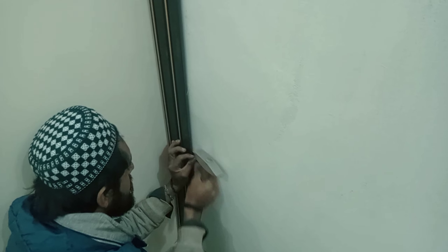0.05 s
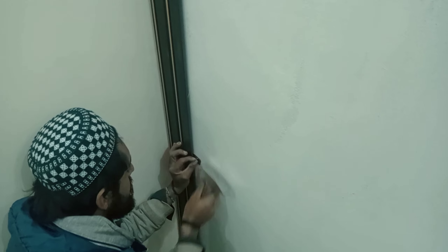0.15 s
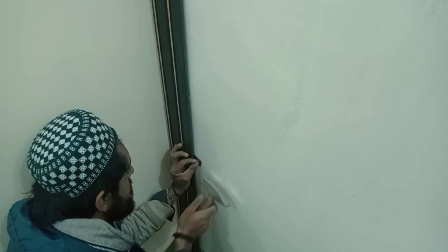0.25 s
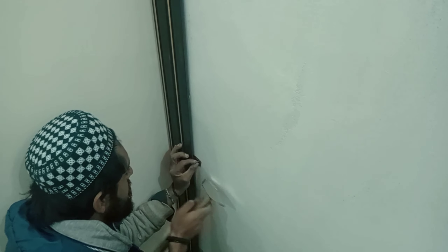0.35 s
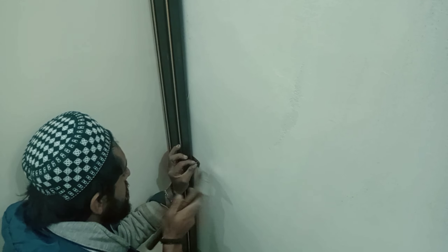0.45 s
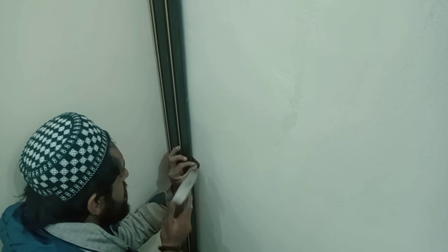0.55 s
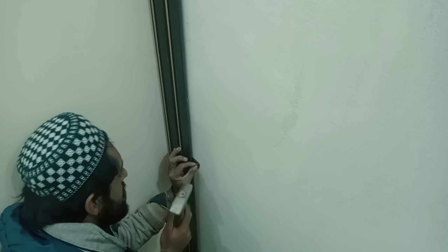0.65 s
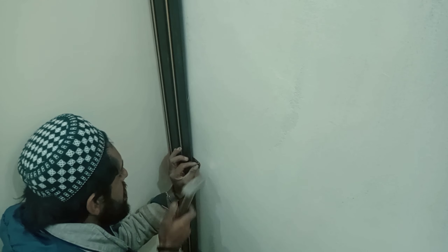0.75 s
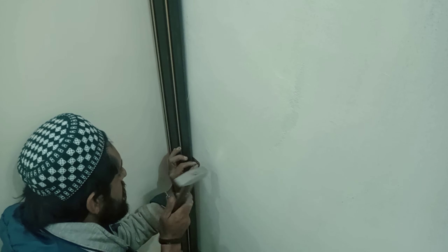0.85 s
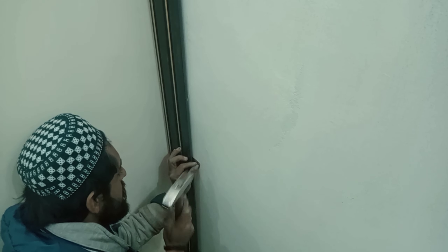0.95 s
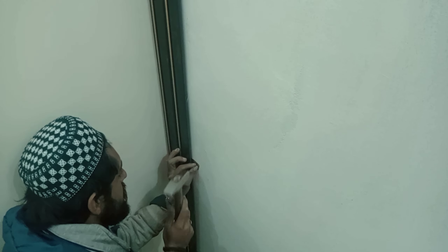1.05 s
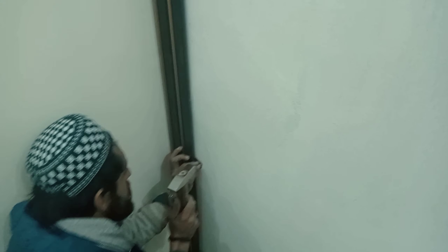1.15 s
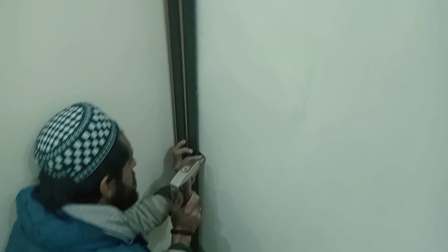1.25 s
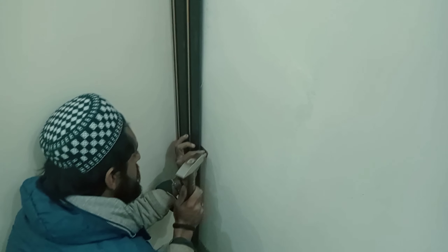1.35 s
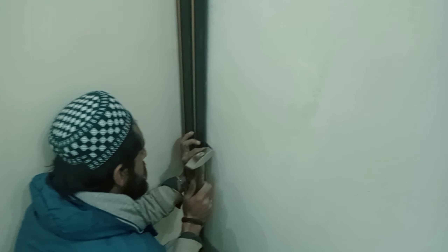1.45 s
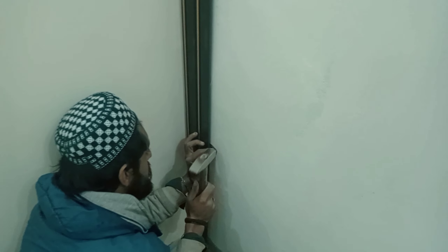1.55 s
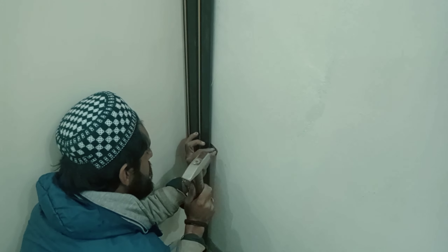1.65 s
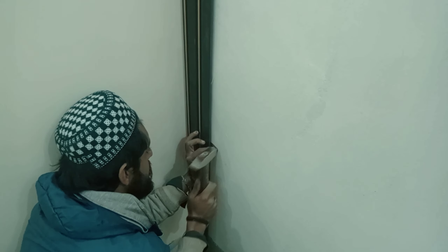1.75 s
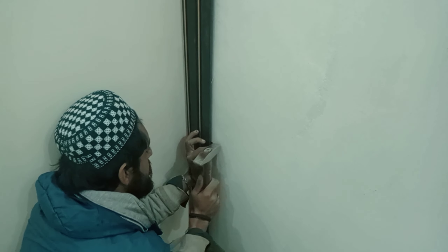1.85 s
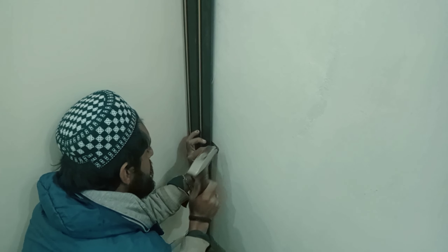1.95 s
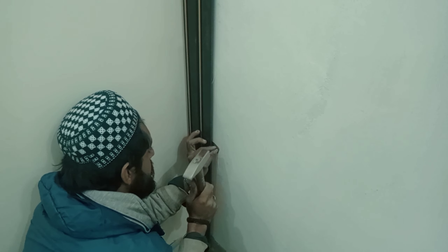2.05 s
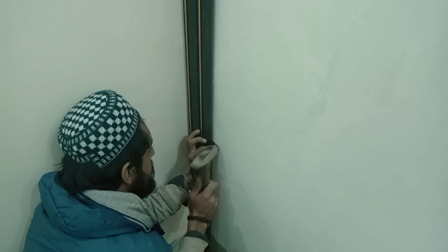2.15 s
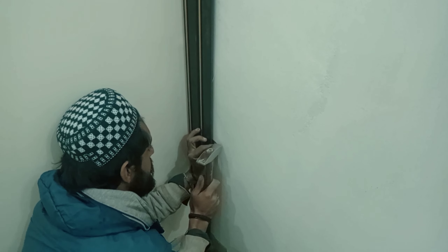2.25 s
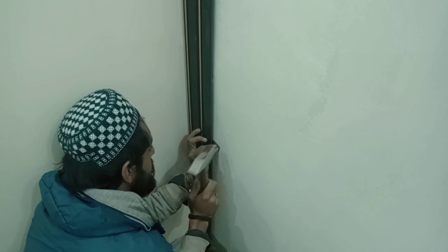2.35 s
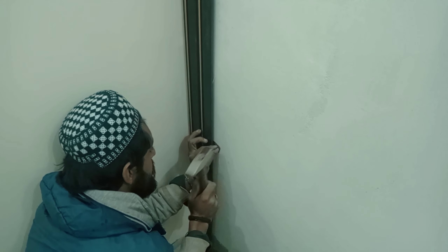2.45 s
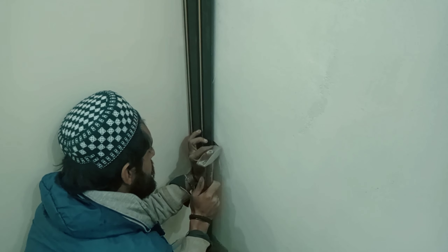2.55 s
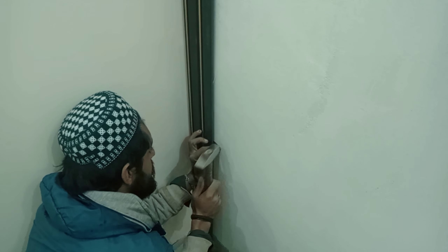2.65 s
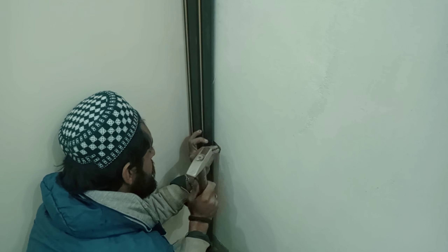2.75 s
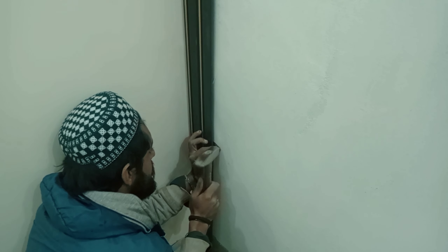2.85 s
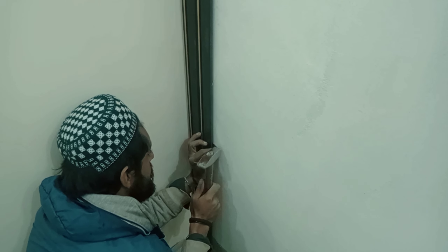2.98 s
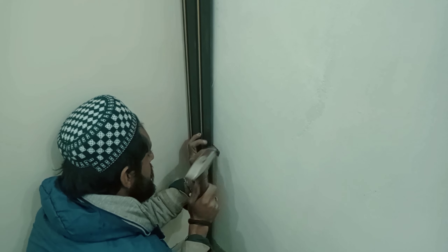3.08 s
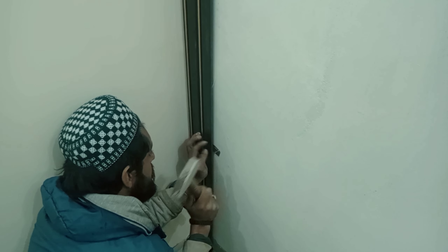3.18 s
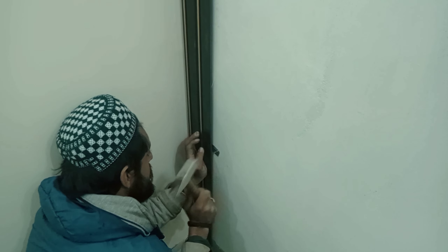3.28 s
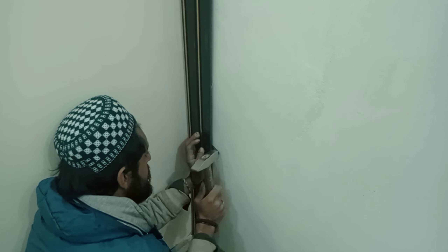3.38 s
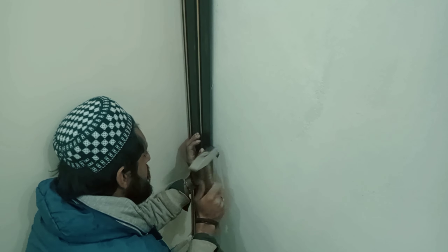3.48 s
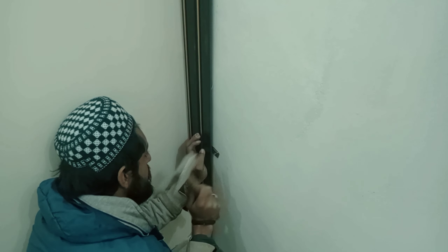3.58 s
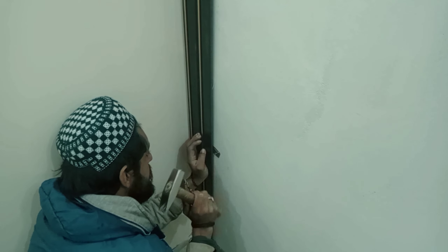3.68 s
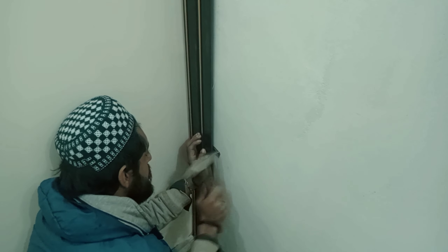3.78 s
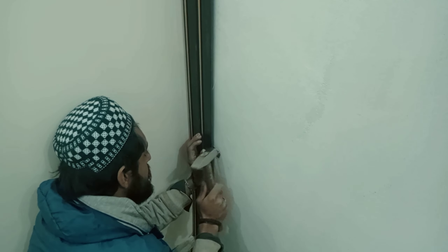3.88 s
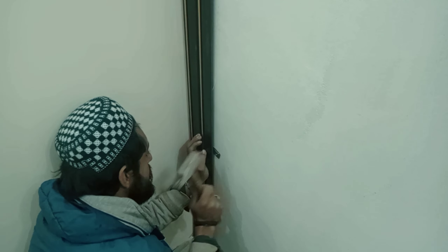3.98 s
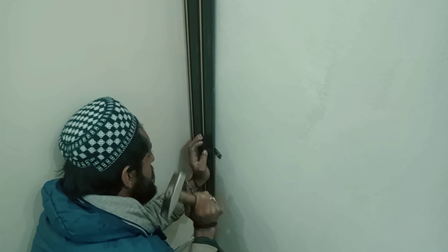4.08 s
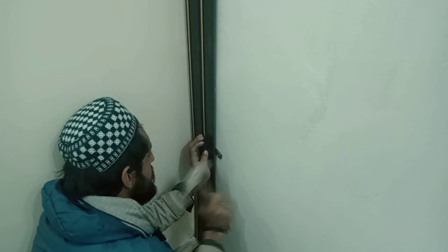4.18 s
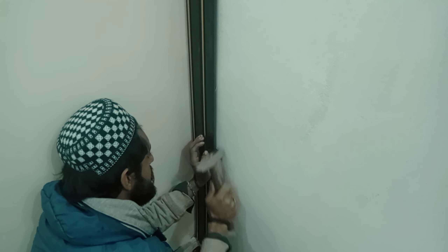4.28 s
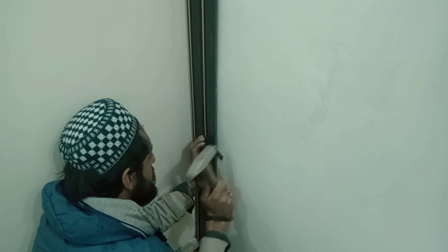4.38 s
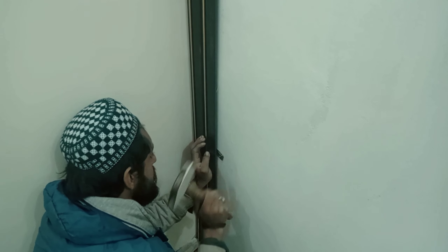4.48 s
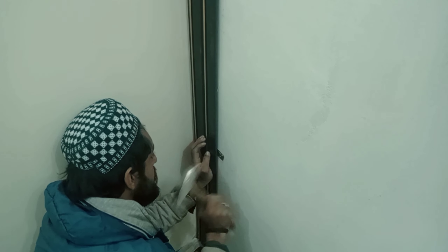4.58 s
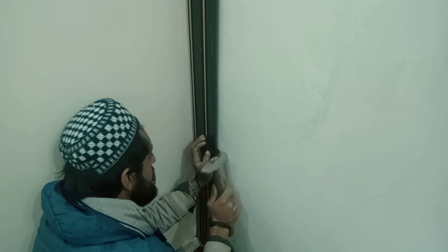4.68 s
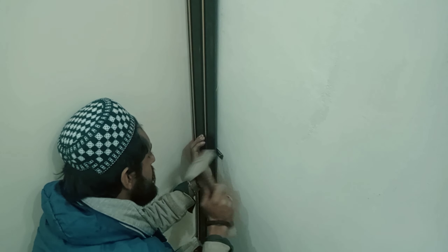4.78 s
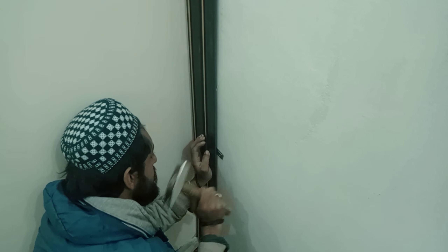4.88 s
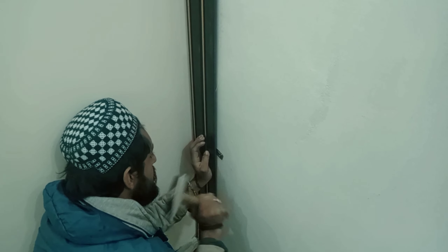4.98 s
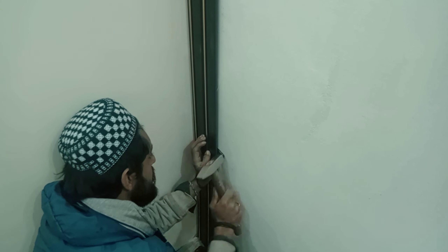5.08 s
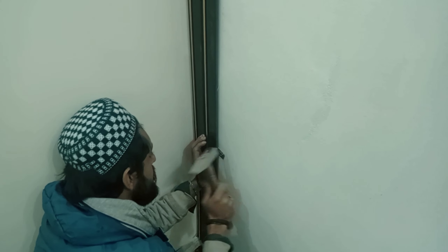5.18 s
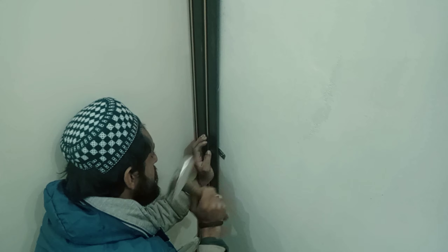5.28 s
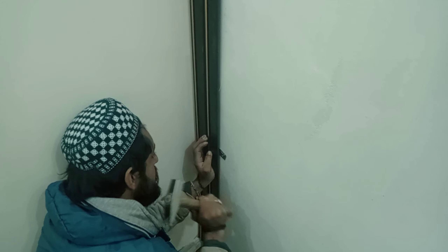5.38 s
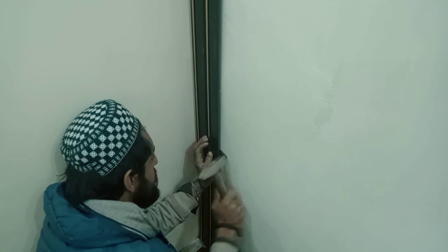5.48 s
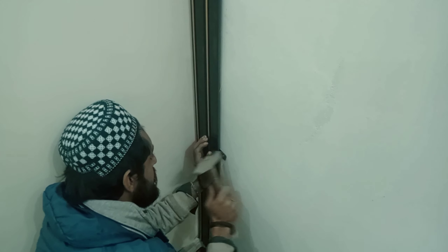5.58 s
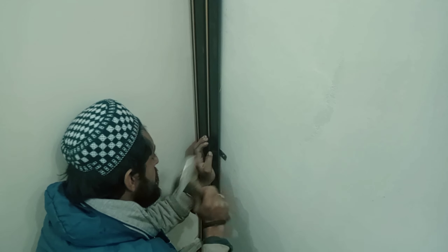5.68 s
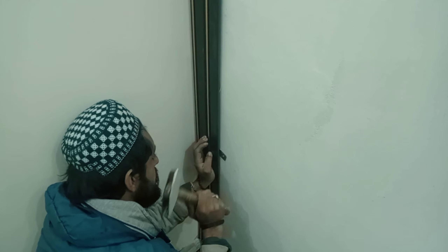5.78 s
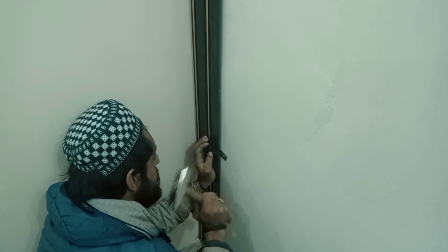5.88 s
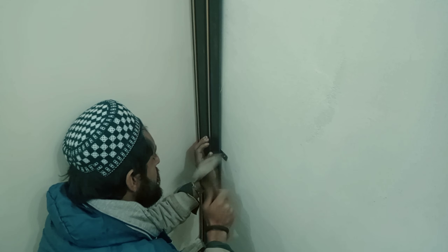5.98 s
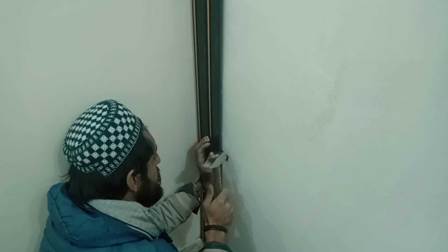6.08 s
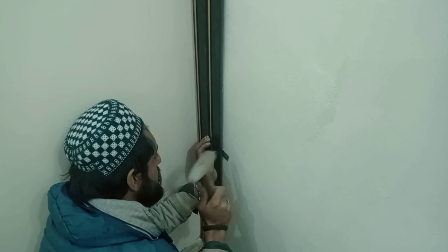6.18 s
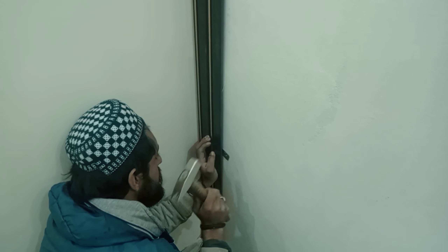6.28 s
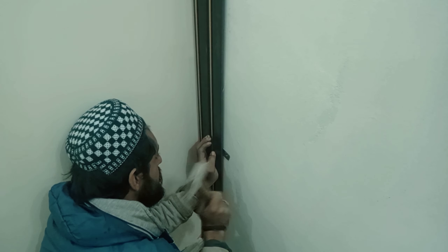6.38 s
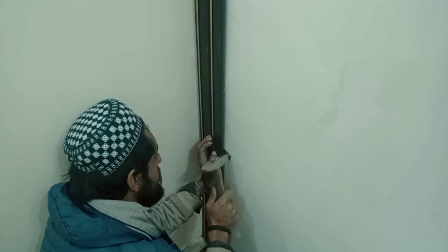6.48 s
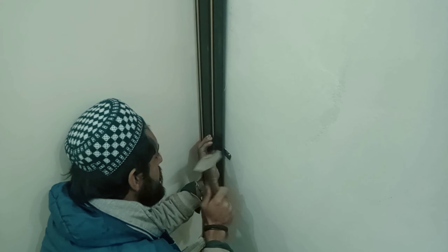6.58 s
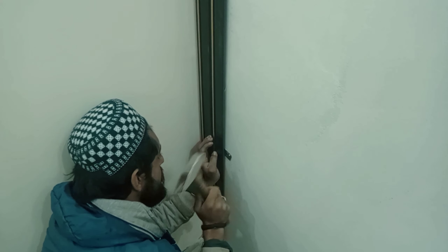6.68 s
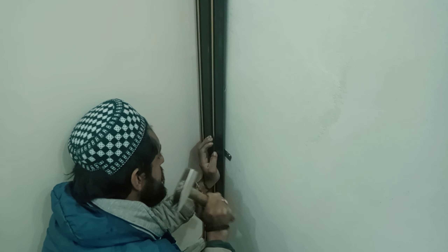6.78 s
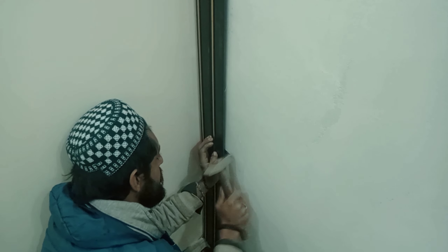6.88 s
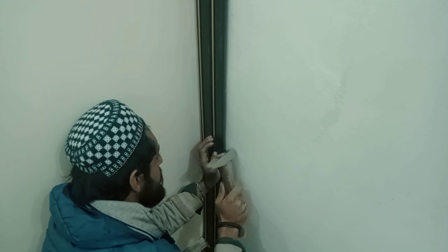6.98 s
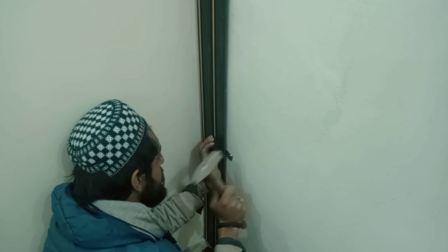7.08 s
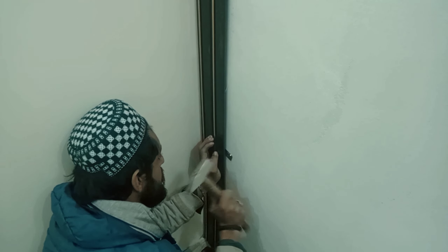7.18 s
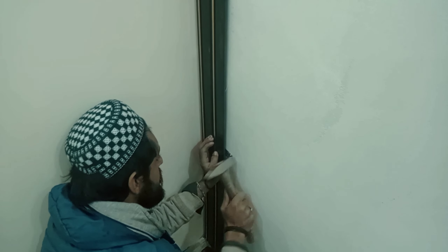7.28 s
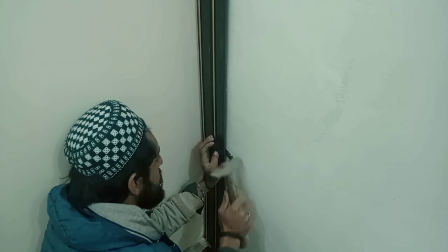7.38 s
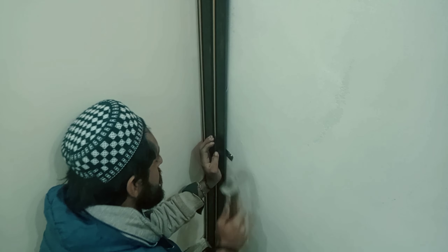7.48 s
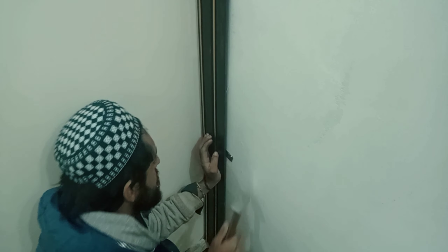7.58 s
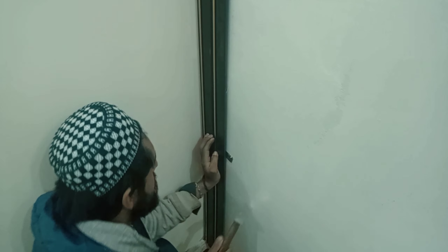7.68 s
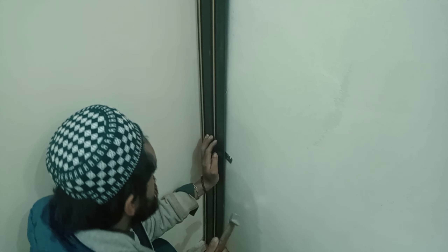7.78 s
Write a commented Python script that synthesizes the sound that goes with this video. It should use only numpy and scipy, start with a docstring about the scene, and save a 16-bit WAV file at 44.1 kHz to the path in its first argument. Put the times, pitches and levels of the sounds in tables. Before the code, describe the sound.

A hammer taps a nail fifteen times in a bare echoing room, light first then hard and ringing, strip rattling, faint hiss underneath.

```python
"""Corner of a bare, plastered room: a hammer drives nails through a panel strip, fifteen blows, light at first.
Each blow is a steel click plus a push on the wall: a dull thud at long contact, a hard knock at short contact.
The strip clacks and rattles, the nail rings; the room adds two early echoes and a long tail with booming modes.
Small touches and one loud rebound of the hammer rattle the strip; hands and sleeves shift before and after
the blows. Steady hiss underneath."""
import sys
import numpy as np
from scipy import signal
from scipy.fft import rfft, irfft
from scipy.io import wavfile
from scipy.ndimage import uniform_filter1d

SR = 44100
rng = np.random.default_rng(int(sys.argv[2]) if len(sys.argv) > 2 else 0)


def store_wav(level_fs):
    """Save 16-bit WAV to argv[1]."""
    pcm = np.round(np.clip(np.atleast_2d(level_fs), -1, 1) * 32767)
    wavfile.write(sys.argv[1], SR, pcm.T.astype(np.int16))


N = 345655

# Background hiss colour. Each row: frequency in Hz, relative density in dB per Hz.
HISS_COLOUR = [(20, -26), (50, -8), (80, -8), (125, -1), (170, -10), (300, -9), (650, -15), (1400, -14),
               (2400, -6.5), (3700, -15), (5700, -36.5), (9500, -33), (13000, -50), (16000, -52)]
# Reverberation time. Each row: frequency in Hz, t60 in seconds.
ROOM_T60 = [(80, 1.76), (210, 0.81), (560, 1.16), (1470, 0.84), (2700, 0.75), (4000, 0.67), (9000, 0.56),
            (15000, 0.28)]
# Standing waves of the room. Each row: frequency in Hz, level in dB, t60 in seconds.
ROOM_MODES = [(127.6, -57.5, 1.24), (196.7, -64, 1.45), (222.6, -63.5, 2.2), (318, -53.5, 0.37),
              (411, -66, 0.59), (457, -55, 0.71), (499, -61.5, 0.47), (555.4, -57.5, 1.15), (667, -84, 0.9),
              (715, -65.5, 1.5), (1140, -59.5, 0.87)]
# First echoes, ceiling and far walls. Each row: delay after the blow in seconds, level in dB.
ECHOES = [(0.0215, -14), (0.0288, -16)]
# Hands and sleeves shifting. Each row: centre in seconds, width between 1/e points in seconds,
# dull rub level in dB, swish level in dB.
SHIFTS = [(0.388, 0.26, -66, -61), (0.666, 0.1, -54.5, -63), (1.067, 0.064, -68, -58.5),
          (7.712, 0.12, -48.5, -49)]
# Rub and swish colours. Each row: frequency in Hz, relative density in dB.
RUB_COLOUR = [(40, -18), (130, 2.5), (600, -3.0), (1300, -18), (3500, -24), (6000, -47)]
SWISH_COLOUR = [(500, -20), (2500, 13), (4600, 3.5), (5600, -10.5), (10000, -9.0), (15000, -26)]
# Small touches on the strip, and one loud rebound of the hammer at 4.208 s.
# Each row: start in seconds, level in dB, centre in Hz.
KNOCKS = [(1.21, -18, 3570), (3.68, -18, 4540), (4.143, -6, 3830), (4.208, 23.5, 3500), (6.765, -13, 2590)]
# Hammer blows. Each row: start in seconds, push in dB, contact time in ms, steel click in dB,
# click tilt in dB per octave, strip clack in dB, nail ring in Hz, its width in Hz, its boost in dB.
BLOWS = [(1.3644, -7, 2.2, -10, 1, -22, 1960, 150, 7), (1.7122, -1.7, 2.05, -7.5, 3, -23.5, 2080, 200, 5.5),
         (2.0923, -1, 1.48, -5.5, -1, -18, 3160, 130, 5), (2.4382, 1, 1.42, -1.2, -2.5, -16.5, 2646, 55, 9),
         (2.7919, 2, 1.28, 0.5, -3, -34, 2630, 100, -4), (3.2996, 1.5, 1.43, 1.5, -0.4, -16, 2750, 80, 8),
         (3.7448, 2.5, 1.67, 1.5, 1, -25, 3600, 80, 4.5), (4.1784, 0, 1.15, 5.5, 1.4, -20, 3700, 120, 4),
         (4.6042, 1.9, 0.89, 3.5, 2.9, -21.5, 2920, 100, 3.5), (5.0402, 2, 0.86, 5, 2.2, -18, 2720, 90, 5),
         (5.4584, 2, 2.47, 6.5, 1.4, -18, 2820, 120, 4), (5.9608, -1.8, 0.48, 0.9, .7, -19, 2900, 280, 5),
         (6.4023, 1.5, 2.32, 0.1, 5.5, -28, 2545, 35, 11.5),
         (6.8415, 0.2, 0.25, 0.4, 1, -27, 2850, 380, 7.5), (7.205, .3, 0.21, 2, .5, -20.5, 3540, 201, 4.5)]
# Radiation of nailed strip and wall in an average blow. Each row: frequency in Hz, gain in dB.
STRIP_GAIN = [(30, -3.5), (75, 11.5), (125, 25), (200, 26.5), (600, 24), (1050, 19), (1350, 12.5),
              (2300, 19), (2600, 21.5), (3800, 19.5), (4600, 6.5), (6000, -2), (8800, 2), (15000, -21.5)]
# Sound straight from the strip, against that of the room. Each row: frequency in Hz, gain in dB.
DIRECT_GAIN = [(100, -9.5), (350, -18), (600, -4), (1500, -5), (2800, -11.5), (3300, -1.5), (4800, 3),
               (8000, 0), (14000, 5.5)]
# Short rings of the strip near the nail. Each row: frequency in Hz, level in dB, t60 in seconds.
STRIP_MODES = [(3515, -38, .028), (4000, -13, 0.041)]
# How readily push and click pass into strip and wall. Each row: frequency in Hz, gain in dB.
PUSH_GAIN = [(150, 1.5), (400, 4), (800, 10), (1600, 13), (3000, 7.5)]
CLICK_GAIN = [(200, -20.5), (700, -6), (1500, -3), (3000, 0)]
# A heavier click is rounder. Each row: frequency in Hz, change in dB per dB of click.
ROUNDING = [(4000, 0), (7000, 0.31), (10000, -0.08), (14000, -1)]

HISS_DB, TOP_HZ = -57.5, 15700
TILT_FROM_HZ = 2900  # above this, the way the face meets the nail makes the click bright or dull
RELEASE_SHARE, RELEASE_NOTCHES = 0.53, 1  # second click as the face leaves deepens the first few notches
SONG_DB, SONG_CYCLES = -41, 28  # nail's own ring against the click; t60 is SONG_CYCLES / width
OVERTONE_HZ, OVERTONE_WIDTH_HZ, OVERTONE_MAX_DB = 11800, 130, 8  # high nail overtone, woken by bright clicks
CLACK_HZ, CLACK_HZ_PER_DB = 3684, 47  # clack at a 0 dB click; it rises with click force
DIRECT_DB, DIRECT_DB_PER_DB = 1.5, -0.64  # the direct sound of clicks over 0 dB is held back
GRIT_RISE_S = .0003  # the grating takes a moment to start
CLACK_RISE_S = 0.00076  # strip rings swell while the face is still on the nail


def undb(db):
    """Decibels to gain."""
    return 10 ** (np.asarray(db) / 20)


def curve(points, hz):
    """Read (Hz, value) points on a log-frequency axis."""
    points_hz, values = np.transpose(points)
    return np.interp(np.log(hz + 1e-3), np.log(points_hz), values)


def bins(size):
    """Bin frequencies in Hz for a spectrum of this many samples."""
    return np.arange(size // 2 + 1) * SR / size


def response(db):
    """Minimum-phase impulse response with this gain in each bin, by folding the cepstrum."""
    cepstrum = irfft(np.log(undb(db)))
    half = len(cepstrum) // 2
    cepstrum[1:half] *= 2
    cepstrum[half + 1:] = 0
    return irfft(np.exp(rfft(cepstrum)))


def noise(points):
    """Noise of unit rms with the given spectrum."""
    spectrum = rfft(rng.standard_normal(N))
    coloured = irfft(spectrum * undb(curve(points, bins(N))), N)
    return coloured / coloured.std()


def ring(modes, t_s):
    """Sum of exponentially decaying sines, each at a random phase."""
    total = 0
    for hz, db, t60_s in modes:
        total = total + undb(db - 60 * t_s / t60_s) * np.sin(2 * np.pi * (hz * t_s + rng.random()))
    return total


def even(x, width_hz):
    """Give a response unit gain on average, keeping its fine ripple."""
    size = 2 * len(x)
    spectrum = rfft(x, size)
    power = uniform_filter1d(np.abs(spectrum) ** 2, max(3, int(width_hz * size / SR)))
    return irfft(spectrum / np.sqrt(power))[:len(x)]


def add(out, start_s, x):
    """Mix x into out from start_s, cut at the end of out."""
    i = int(start_s * SR)
    out[i:i + len(x)] += x[:max(0, len(out) - i)]


def hiss():
    """Faint steady background: stationary coloured noise."""
    return undb(HISS_DB) * noise(HISS_COLOUR)


def room(build_s):
    """Diffuse tail: noise that builds up and decays per frequency, plus ringing standing waves."""
    t_s = np.arange(3 * SR // 2) / SR
    hz, frame_s, cells = signal.stft(rng.standard_normal(len(t_s)), SR, nperseg=512)
    fade = undb(-60 * frame_s / curve(ROOM_T60, hz)[:, None])
    tail = signal.istft(cells * fade, SR)[1][:len(t_s)]
    swell = 1 - np.exp(-t_s / build_s)
    return even(tail * swell, width_hz=78) + ring(ROOM_MODES, t_s) * swell


def chatter(t_s, hold_s, decay_s, split_hz):
    """One clean push in the bass; in the treble the nail grates and the strip rattles for a few ms."""
    envelope = np.exp(-np.maximum(t_s - hold_s, 0) / decay_s) * (1 - np.exp(-t_s / GRIT_RISE_S))
    grit = even(rng.standard_normal(len(t_s)) * envelope, width_hz=2000)
    impulse = 1. * (t_s == 0)
    low = signal.sosfilt(signal.butter(2, split_hz, fs=SR, output="sos"), impulse)
    high = signal.sosfilt(signal.butter(2, split_hz, "high", fs=SR, output="sos"), grit)
    return low + high


def handling(walls):
    """Touches and a hammer rebound rattle the strip in a resonant band; hands and sleeves rub as swelling noise."""
    out, hz, t_s = np.zeros(N), bins(size=1024), np.arange(N) / SR
    for start_s, db, centre_hz in KNOCKS:
        detuning = 3.5 * (hz / centre_hz - centre_hz / (hz + 100))
        knock = response(db - 20 * np.log10(1 + detuning ** 2))
        rattle = chatter(t_s[:len(knock)], hold_s=.002, decay_s=0.0026, split_hz=1200)
        add(out, start_s, signal.fftconvolve(knock, rattle))
    rub, swish = noise(RUB_COLOUR), noise(SWISH_COLOUR)
    for centre_s, width_s, rub_db, swish_db in SHIFTS:
        envelope = np.exp(-(2 * (t_s - centre_s) / width_s) ** 2)
        out += envelope * (undb(rub_db) * rub + undb(swish_db) * swish)
    return undb(0.5) * out + undb(-2.5) * signal.fftconvolve(out, walls)[:N]


def ripple(hz, spacing_hz):
    """Irregular peaks and dips from the many close treble modes of nail and strip; spread near 1."""
    grid_hz = np.arange(0, SR / 2, spacing_hz)
    heights = rng.standard_normal(len(hz))[:len(grid_hz)]
    return np.interp(hz, grid_hz, heights) * np.clip((hz - 900) / 5000, 0, 1) ** .5


def contact(hz, push_db, contact_ms, click_db, tilt_db):
    """Blow spectrum in dB: push with notches at multiples of 1 / contact time, plus steel click."""
    cycles = hz * contact_ms / 1000
    push = undb(push_db + curve(PUSH_GAIN, hz)) * np.sinc(cycles)
    tilt = tilt_db * np.log2(np.maximum(hz / TILT_FROM_HZ, 1))
    click = undb(click_db + curve(CLICK_GAIN, hz) + tilt + click_db * curve(ROUNDING, hz))
    release = 1 - RELEASE_SHARE * np.cos(2 * np.pi * cycles) * np.exp(-cycles / RELEASE_NOTCHES)
    return 10 * np.log10(push ** 2 + click ** 2 * release)


def nail_resonance(hz, nail_hz, width_hz, boost_db, tilt_db):
    """Gain in dB of the nail: its main resonance and a high overtone that grows with click tilt."""
    main = boost_db / (1 + ((hz - nail_hz) / width_hz) ** 4)
    overtone_db = OVERTONE_MAX_DB * np.clip(tilt_db / 2, 0, 1)
    return main + overtone_db / (1 + ((hz - OVERTONE_HZ) / OVERTONE_WIDTH_HZ) ** 2)


def strip_clack(t_s, clack_db, click_db):
    """Swelling strip rings; the adjoining wall of the corner throws the clack straight back."""
    clack_hz = CLACK_HZ + CLACK_HZ_PER_DB * click_db
    swell = 1 - np.exp(-t_s / CLACK_RISE_S)
    clack = undb(clack_db) * swell * ring(STRIP_MODES + [(clack_hz, -15, .02)], t_s)
    add(clack, .004, undb(clack_db + 4.5) * ring([(clack_hz, -15, .018)], t_s))
    return clack


def hammer(walls):
    """Every blow drives the strip through the nail; heard directly, as first echoes and through the room."""
    out, hz = np.zeros(N), bins(size=4096)
    t_s, song_t_s = np.arange(2 * len(hz) - 2) / SR, np.arange(SR) / SR
    straight = response(curve(DIRECT_GAIN, hz))
    strip = curve(STRIP_GAIN, hz) + 1.1 * ripple(hz, spacing_hz=160)
    for start_s, push_db, contact_ms, click_db, tilt_db, clack_db, nail_hz, width_hz, boost_db in BLOWS:
        colour = contact(hz, push_db, contact_ms, click_db, tilt_db) + 2.4 * ripple(hz, spacing_hz=120)
        blow = response(strip + colour + nail_resonance(hz, nail_hz, width_hz, boost_db, tilt_db))

        rattle = chatter(t_s, hold_s=0.0028, decay_s=0.0062, split_hz=820)
        near = signal.fftconvolve(straight, rattle)[:len(t_s)] + strip_clack(t_s, clack_db, click_db)
        direct_db = DIRECT_DB + DIRECT_DB_PER_DB * max(click_db, 0)
        add(out, start_s, undb(direct_db) * signal.fftconvolve(blow, near))

        # a nail left free to swing sings on: the narrower its resonance, the longer
        song = (nail_hz, click_db + boost_db + SONG_DB, SONG_CYCLES / width_hz)
        add(out, start_s, ring([song], song_t_s))

        for lag_s, echo_db in ECHOES:
            echo = chatter(t_s, hold_s=0.0068, decay_s=0.0037, split_hz=610)
            add(out, start_s + lag_s, undb(echo_db) * signal.fftconvolve(blow, echo))

        # the microphone moves between blows, so part of the tail is new each time
        tail = undb(-2.0) * walls + undb(-5) * room(build_s=0.027)
        add(out, start_s, signal.fftconvolve(blow, tail))
    return out


def scene():
    """Hiss, handling and hammering in one room."""
    walls = room(build_s=0.018)
    return (hiss() + handling(walls) + hammer(walls))[None]


def record(dry):
    """The microphone rounds only the very highest peaks; the top is cut steeply."""
    rounded = dry / (1 + (dry / .88) ** 6) ** (1 / 6)
    return signal.sosfilt(signal.ellip(10, .2, 90, TOP_HZ, fs=SR, output="sos"), rounded)


dry = scene()
out = record(dry)
store_wav(out)
```